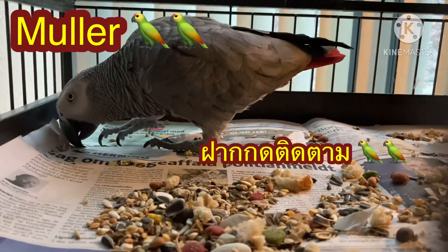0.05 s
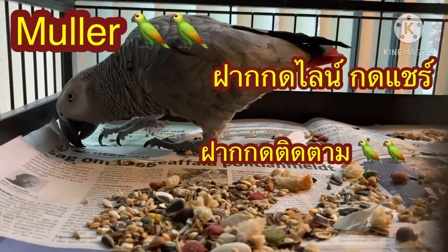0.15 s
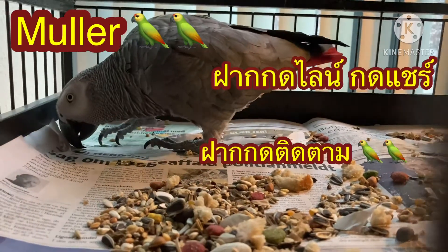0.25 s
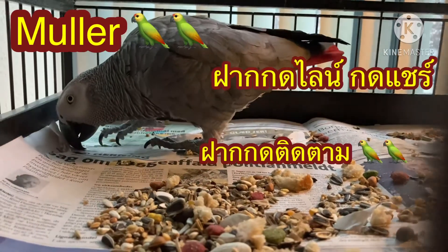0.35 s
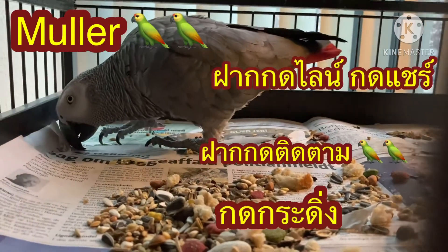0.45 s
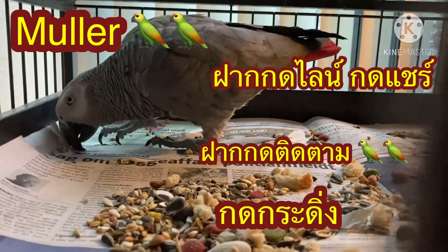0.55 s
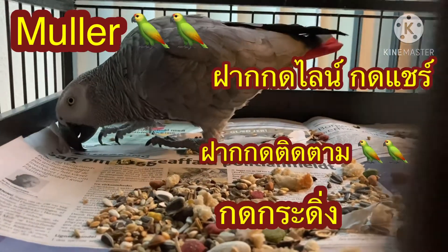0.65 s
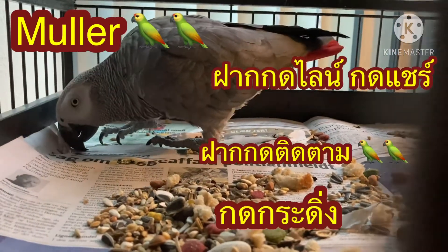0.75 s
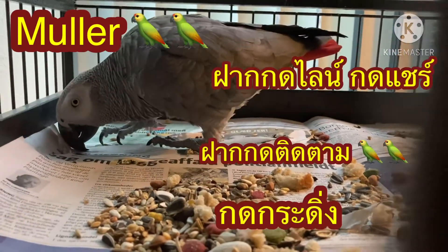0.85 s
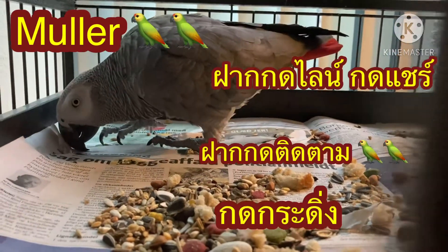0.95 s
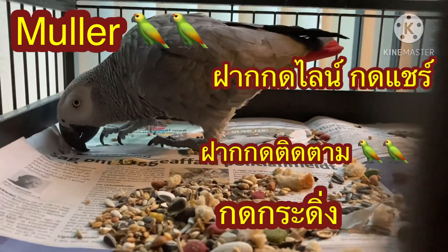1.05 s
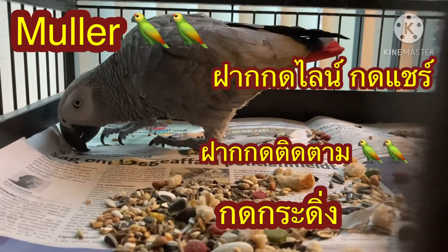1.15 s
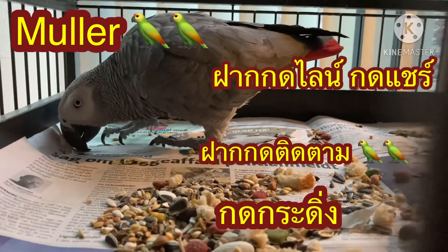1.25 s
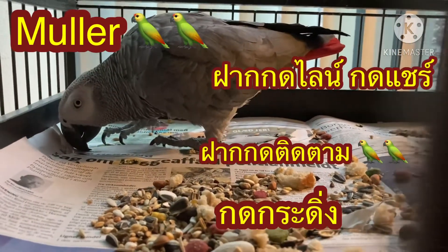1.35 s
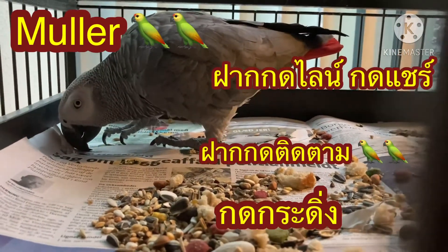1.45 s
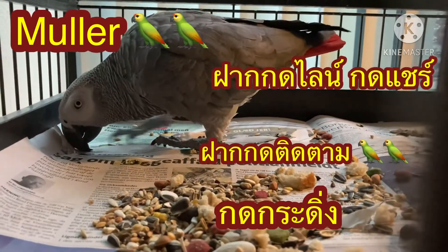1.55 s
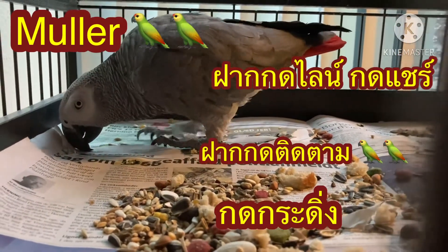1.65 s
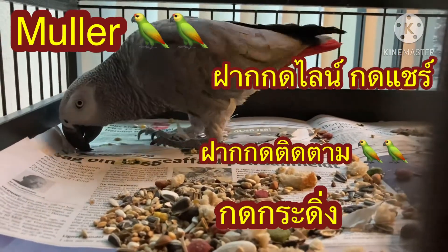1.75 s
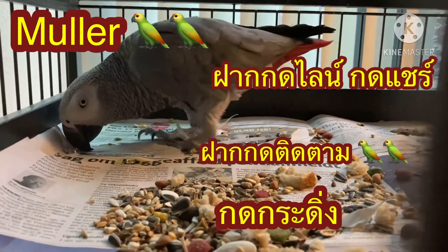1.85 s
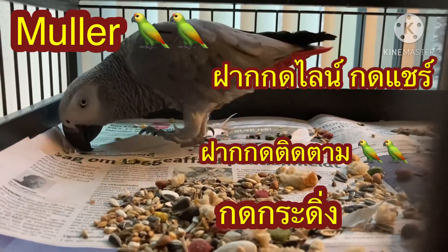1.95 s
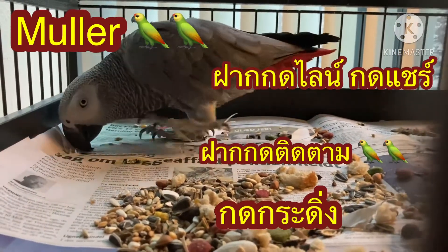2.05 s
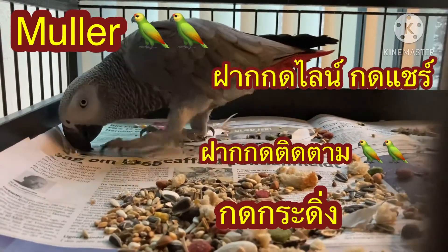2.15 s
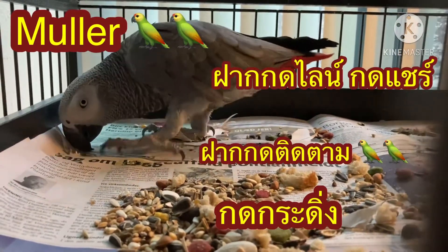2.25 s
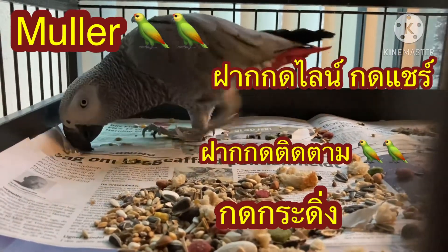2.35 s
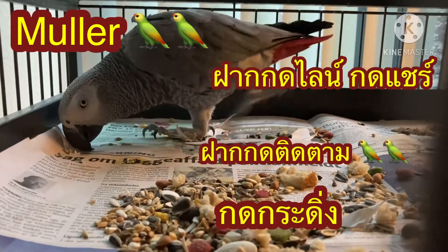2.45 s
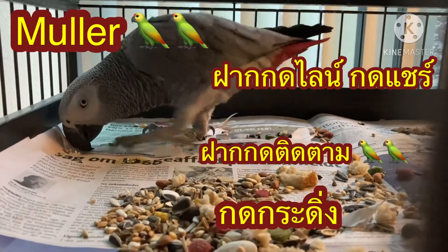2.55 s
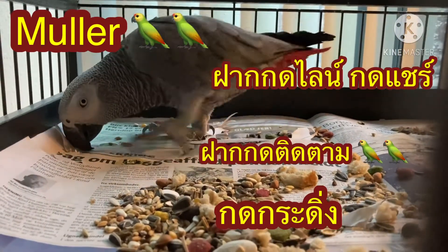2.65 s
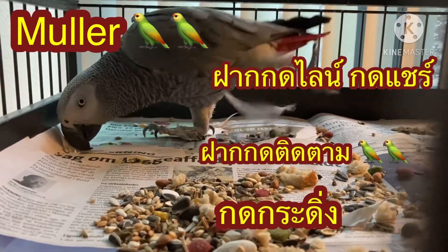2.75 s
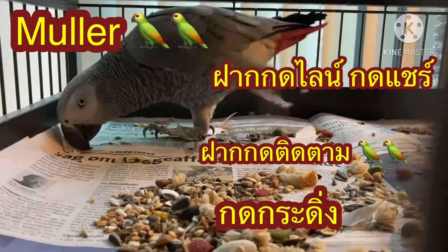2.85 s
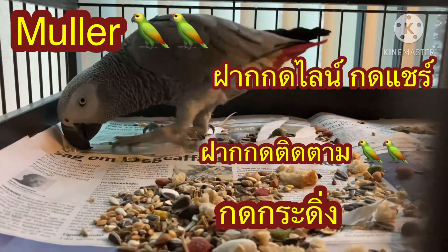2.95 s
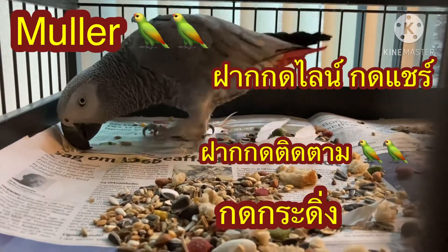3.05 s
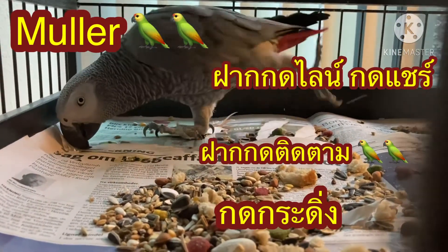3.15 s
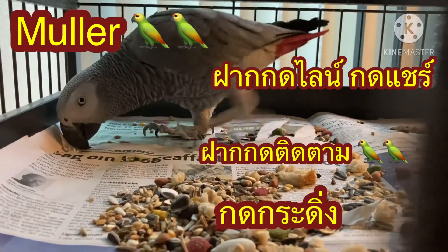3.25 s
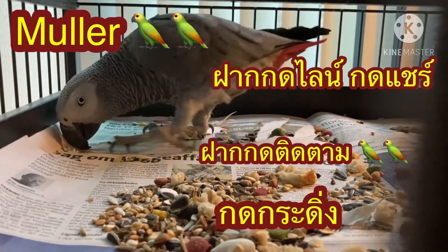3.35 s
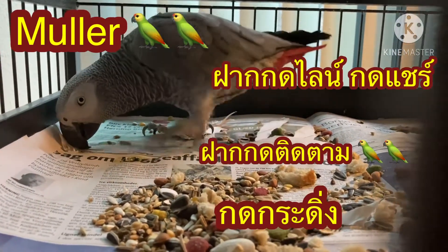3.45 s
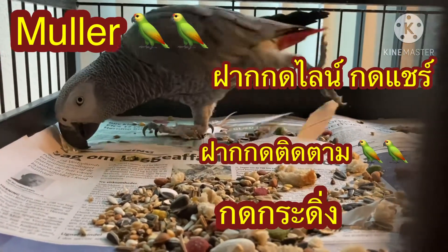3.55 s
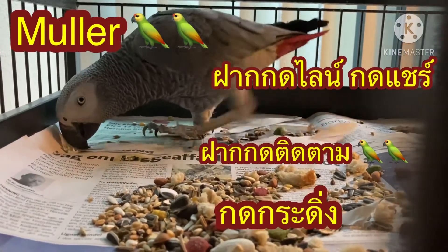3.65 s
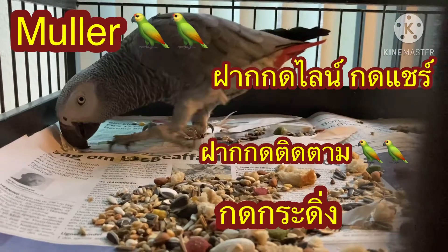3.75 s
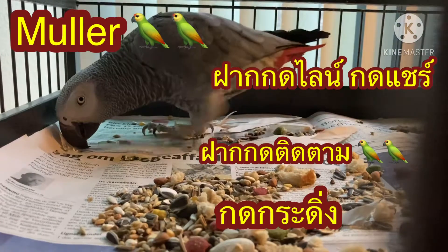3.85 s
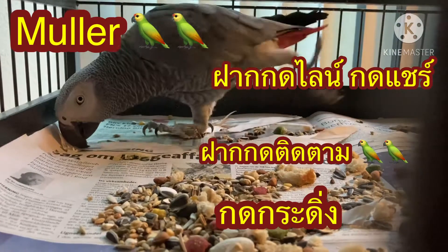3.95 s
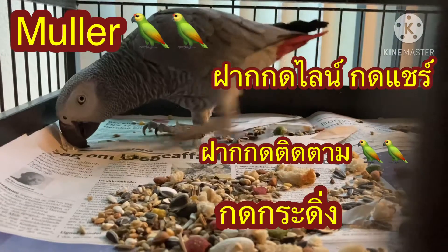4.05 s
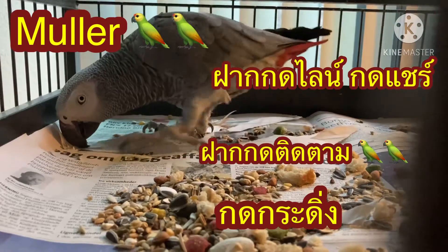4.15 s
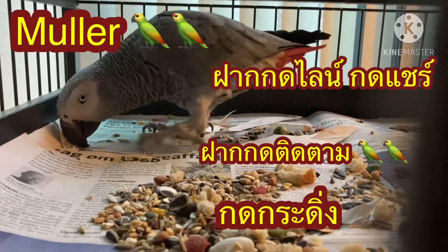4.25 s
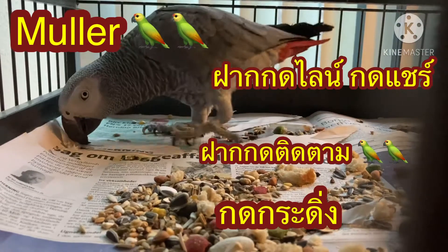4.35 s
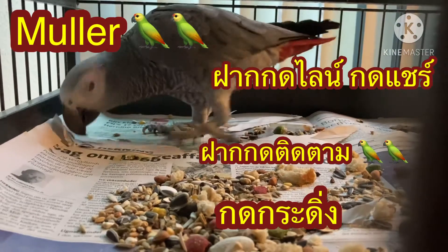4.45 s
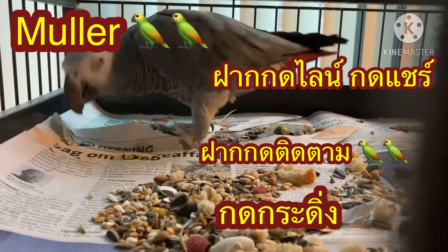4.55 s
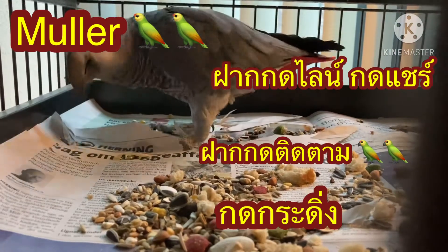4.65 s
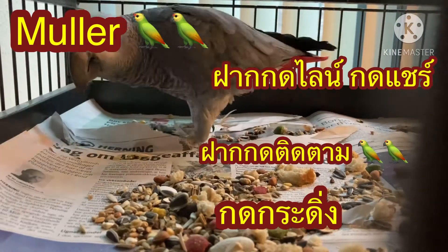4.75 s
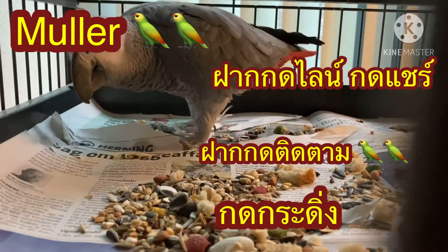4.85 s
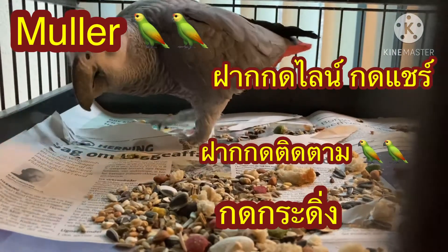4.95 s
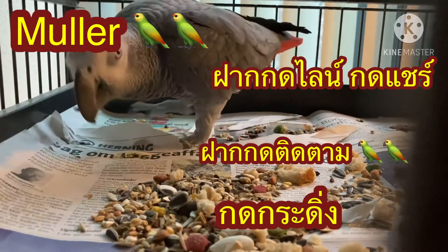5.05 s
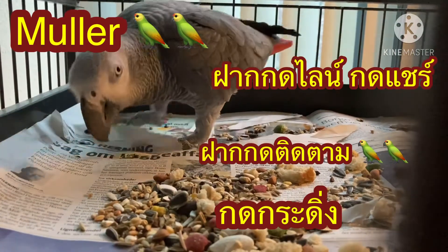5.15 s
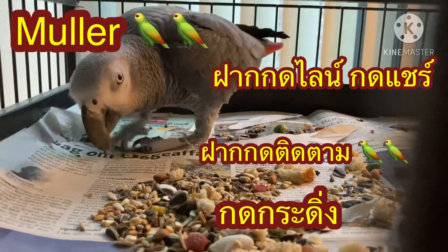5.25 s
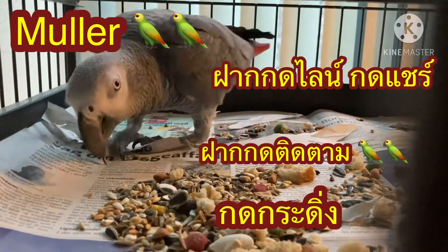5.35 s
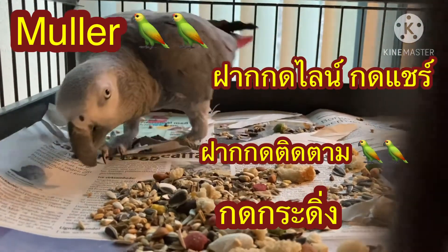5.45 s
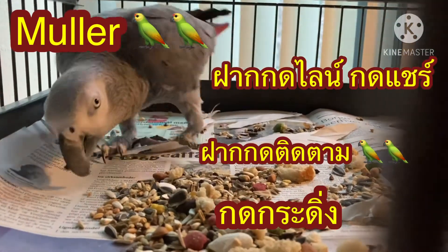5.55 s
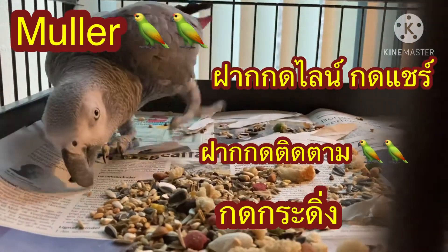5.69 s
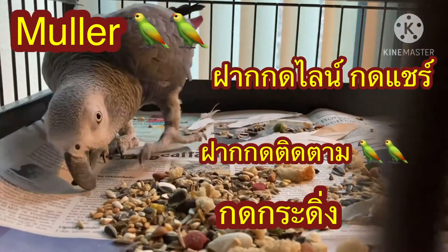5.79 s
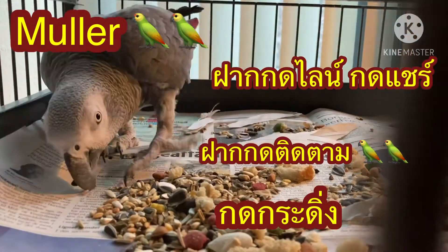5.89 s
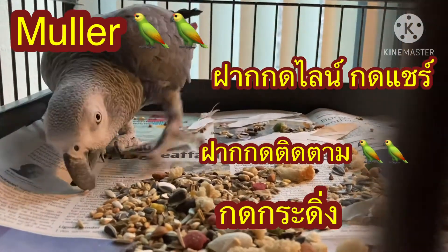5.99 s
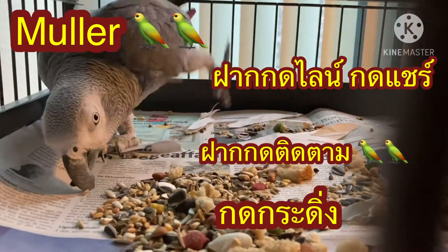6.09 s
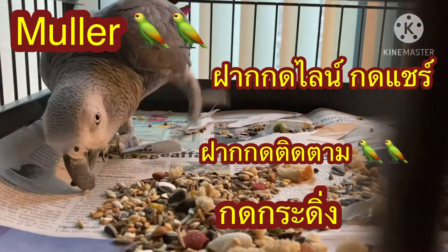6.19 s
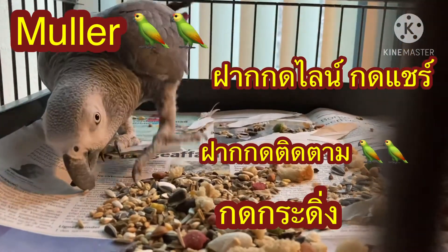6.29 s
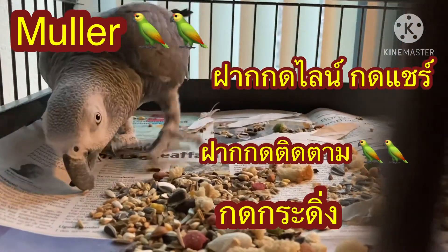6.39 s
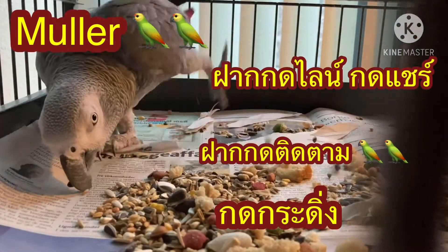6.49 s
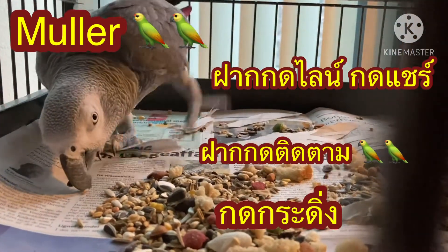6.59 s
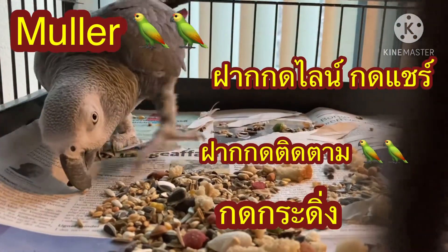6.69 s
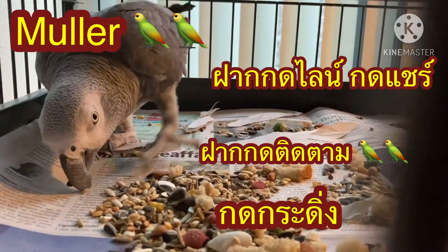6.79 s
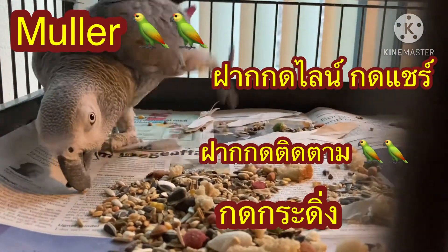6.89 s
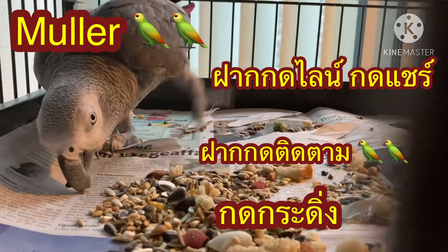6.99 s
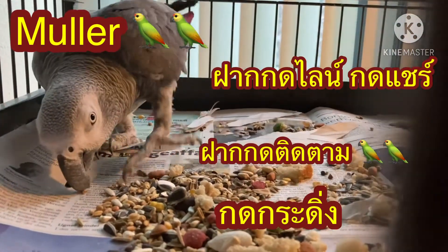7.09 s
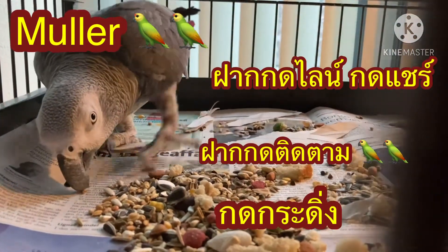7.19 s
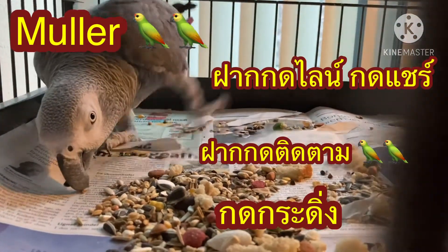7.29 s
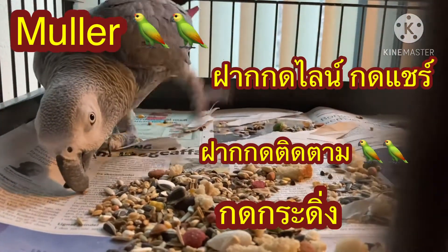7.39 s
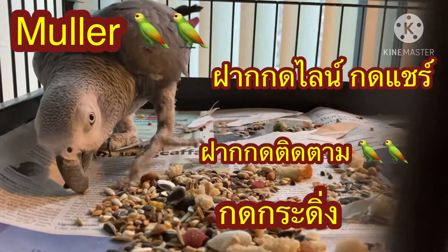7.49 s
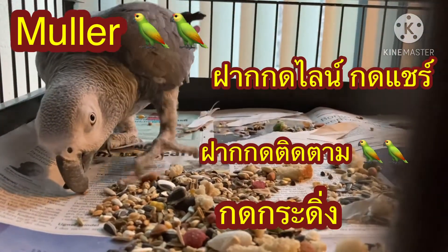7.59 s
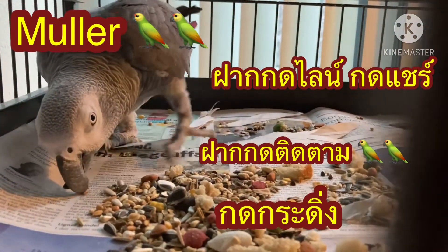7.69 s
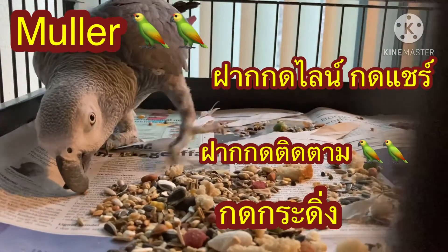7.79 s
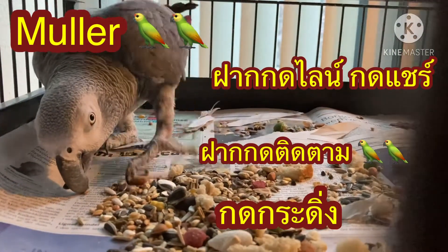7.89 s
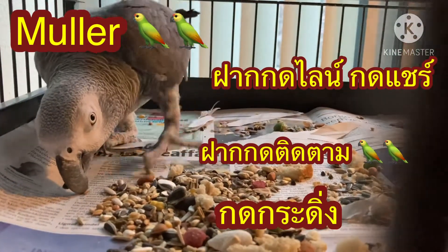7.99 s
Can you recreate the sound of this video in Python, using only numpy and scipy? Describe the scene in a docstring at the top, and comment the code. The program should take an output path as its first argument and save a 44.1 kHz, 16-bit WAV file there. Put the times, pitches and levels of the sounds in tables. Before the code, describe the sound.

A parrot scratches backward through seeds on crinkling newspaper in a cage, raking in short bouts, banging the tray once, tapping its beak between them.

```python
"""A parrot scratches backwards with its foot, again and again, on seed-strewn newspaper in a cage. Clumped
random grains make the dragged claws, creasing paper, flung seeds and shaken tray of each stroke. One kick bangs
the tray, a later one snaps the sheet; noise bursts and decaying tones make these, the footfalls, the clicking
seeds and the beak that taps the floor in a pause. Noise resonating at one low pitch makes each boom. A small,
quiet room; a close stereo microphone with two ports hears it all over a faint rumble and hiss."""
import sys
import numpy as np
from scipy import signal
from scipy.fft import rfft, irfft
from scipy.io import wavfile

SR = 44100
rng = np.random.default_rng(int(sys.argv[2]) if len(sys.argv) > 2 else 0)


def output_pcm(signal):
    """Save a mono or channel-first signal as 16-bit PCM at the path in sys.argv[1].

    Samples are clipped to [-1, 1] before scaling.
    """
    pcm = np.clip(np.atleast_2d(signal).T, -1, 1) * 32767
    wavfile.write(sys.argv[1], SR, np.round(pcm).astype(np.int16))


N = 354123
T = np.arange(N) / SR
SLOW_T = T[::64]  # coarse clock for the movements
FILTER_TAPS = 8192
FILTER_HZ = np.fft.rfftfreq(FILTER_TAPS, 1 / SR)


def amp(db):
    """Decibels to gain."""
    return 10 ** (np.asarray(db) / 20)


def evened(x):
    """Scales to rms 1."""
    return x / np.sqrt(np.mean(x ** 2) + 1e-20)


def read(points, hz):
    """Reads a curve on a log-frequency axis."""
    f, value = np.transpose(points)
    return np.interp(np.log(hz + 1), np.log(f + 1), value)


def add(mix, s, sound):
    """Mixes a sound in at time s."""
    part = mix[round(s * SR):][:len(sound)]
    part += sound[:len(part)]


# Resonances of the tray and cage. Each row: pitch in Hz, width in Hz, height in dB before its share.
CAGE_RESONANCES = [(251, 16, 12.5), (281.5, 23, 11), (409, 6.7, 6), (749, 37, 5.5), (1020, 11, 7.5),
                   (1125, 56, 4.5), (1188, 20, -2.5), (1510, 13, 7), (1760, 23, -4), (1726, 16, 6.5),
                   (2280, 8.8, -1.5), (2260, 25, -5.5), (2890, 4.7, 4), (3010, 16, 9), (3520, 77, 4),
                   (3754, 170, 6)]


def colour(x, tone, ring=0):
    """Causal filter of unit energy: a broad spectrum, plus a share of the cage's resonances in dB."""
    resonances = sum(g / (1 + (2 * (FILTER_HZ - f) / w) ** 2) for f, w, g in CAGE_RESONANCES)
    db = read(tone, FILTER_HZ) + ring * resonances
    log_gain = np.log(amp(np.r_[db, db[-2:0:-1]]))
    # the minimum phase that belongs to this gain
    response = np.fft.ifft(np.exp(np.conj(signal.hilbert(log_gain)))).real
    return signal.oaconvolve(x, response / np.linalg.norm(response))[:len(x)]


def resonate(x, hz, width_hz):
    """A resonance of gain 1 that follows the curve hz."""
    turn = np.exp(2j * np.pi * np.cumsum(hz) / SR)
    r = np.exp(-np.pi * width_hz / SR)
    return 2 * (turn * signal.lfilter([1 - r], [1, -r], x / turn)).real


def wander(rate_hz):
    """Smooth chance of rms 1 with changes up to about the given rate."""
    hz = np.fft.rfftfreq(N, 1 / SR)
    return evened(irfft(rfft(rng.standard_normal(N)) / (1 + (hz / rate_hz) ** 4), N))


def grains(per_s, spread_db, clump_db, clump_hz):
    """Tiny slips and impacts of uneven size that arrive in clumps."""
    size = amp(spread_db * np.minimum(rng.exponential(1, N), 4))
    clicks = size * rng.choice([-1, 1], N) * (rng.random(N) < per_s / SR)
    return evened(clicks * amp(clump_db * wander(clump_hz)))


def burst(t60, rise):
    """Up to a quarter second of noisy contact that rises quickly and dies away."""
    t = T[:SR // 4]
    return rng.standard_normal(len(t)) * amp(-60 * t / t60) * (1 - np.exp(-t / rise))


def swell(s, rise_s, fall_s, hold_s=0):
    """Grows exponentially, holds for hold_s up to time s, then dies away."""
    before = np.maximum(s - hold_s - SLOW_T, 0)
    after = np.maximum(SLOW_T - s, 0)
    return np.exp(-before / rise_s - after / fall_s)


def rustle(s, length, rise_s=0.0025, sag_db_per_s=19.5, fall_s=0.021):
    """Starts quickly, sags while the weight shifts, then settles."""
    age = np.maximum(SLOW_T - s, 0)
    settling = np.exp(-np.maximum(age - length, 0) / fall_s)
    return (1 - np.exp(-age / rise_s)) * amp(-sag_db_per_s * age) * settling


def together(moves, rest_db):
    """Movements add in power over a faint steady stir: a gain at every sample."""
    power = amp(rest_db) ** 2 + np.sum(np.square(moves), axis=0)
    return np.interp(T, SLOW_T, np.sqrt(power))


# Background of the small room. Each row: frequency in Hz, relative level in dB per Hz.
BACKGROUND_TONE = [(20, 0), (60, -2), (120, -8), (280, -14.5), (550, -29), (1400, -31.5), (4000, -33),
                   (10000, -59), (16000, -38)]


def room_noise():
    """A faint low rumble and hiss from filtered noise, mostly shared by the ports."""
    left, right, shared = (colour(rng.standard_normal(N), BACKGROUND_TONE) for _ in range(3))
    return amp(-71) * evened(shared + 0.36 * np.array([left, right]))


# The clearest single seeds and creases clicking close to the microphone.
# Each row: start in seconds, relative level in dB, dull body against treble in dB.
CLEAR_TICKS = [(0.111, -62, -5.5), (0.602, -39, -11), (0.724, -53.5, -16.5), (0.8126, -51, -15),
               (1.2125, -49, -21), (1.9176, -41, -16), (2.0906, -38, -7.5), (2.2378, -33, -2.5),
               (2.4885, -41, -16), (2.6553, -22.5, -2.5), (2.7603, -27.5, -4.5), (3.015, -37, 9.5),
               (3.0394, -28.5, -6), (3.1149, -32, -12.5), (3.4413, -25.5, 0.5), (3.6489, -37, -4),
               (4.083, -36.5, -1.5), (5.2194, -26, -15.5), (5.2299, -33.5, -13.5), (5.3534, -30, -24),
               (5.7032, -33, -31), (5.952, -24, -3), (5.9659, -18, -12.5), (6.1945, -38.5, -30.5),
               (6.352, -17.5, -28), (6.371, -25, 1.5), (6.454, -31, -21.5), (6.7536, -18, -9),
               (6.78, -16, -6.5), (6.837, -30, -25), (6.8572, -31, -15), (7.1549, -17, -9),
               (7.1656, -25.5, -7.5), (7.1806, -20.5, -15.5), (7.1881, -21.5, -15), (7.5094, -37.5, -3),
               (7.766, -32.5, -13)]


def ticks():
    """A hard seed clicks with its own brief pitch, over a duller knock on the paper."""
    out, t = np.zeros(N), T[:SR // 4]
    for s, db, body_db in CLEAR_TICKS + strays():
        contact = burst(t60=.009, rise=.0005)
        shell = np.sin(2 * np.pi * rng.uniform(6500, 11000) * t) * amp(-60 * t / 0.012)
        click = colour(contact + 0.27 * shell, SEED_TONE)
        body = colour(burst(t60=0.0099, rise=0.00023), PAPER_TONE, ring=0.44)
        tick = click / abs(click).max() + amp(body_db) * body / abs(body).max()
        add(out, s, amp(db + 3.5) * tick)
    return out


def strays(count=70, crowding=.5, above_db=11.5, spread_db=5, body_db=-7):
    """Rows like CLEAR_TICKS for seeds that land at random, more and louder while the heap is stirred."""
    stir = skittering()
    chance = np.cumsum(stir ** crowding)
    when, size = rng.random((count, 2)).T
    at = np.searchsorted(chance, when * chance[-1])
    level_db = 20 * np.log10(stir[at]) + above_db + spread_db * (2 * size - 1)
    return [(s, db, body_db) for s, db in zip(T[at], level_db)]


# Backward strokes of the foot; the four layers below share them. Each row: release in seconds,
# wind-up in seconds before each layer's factor, relative levels of claws, paper, seeds and tray in dB,
# seconds by which the seeds fly early (negative: late).
FOOT_STROKES = [(2.283, .01, -31.5, -41.5, -46.5, -59, -0.0012),
                (2.655, 0.018, -33.5, -35, -41, -42, -0.0035),
                (3.034, 0.033, -41, -29.5, -41, -43.5, -0.0011),
                (3.436, 0.044, -41.5, -31.5, -42.5, -48, -0.0075),
                (3.825, .028, -36.5, -24, -46, -41.5, -0.0017),
                (5.989, 0.051, -40.5, -27.5, -41, -39, 0.034), (6.375, 0.055, -34, -30, -39, -42.5, 0.013),
                (6.786, 0.056, -36.5, -24.5, -39.5, -38.5, 0.012),
                (7.195, 0.067, -37, -34.5, -39, -42.5, 0.01)]
# The bird shifts its weight and the sheet rustles; the four layers share this too. Each row: start in
# seconds, length in seconds, relative levels of claws, paper, seeds and tray in dB.
WEIGHT_SHIFTS = [(0.17, 0.18, -73.5, -65, -70, -74.5), (0.437, .11, -83.5, -70.5, -75.5, -88),
                 (0.57, .11, -81, -66.5, -65.5, -83.5), (1.477, 0.15, -70.5, -90, -65.5, -74),
                 (1.651, 0.16, -60.5, -60.5, -66, -65), (1.774, 0.094, -65, -62, -54, -69.5),
                 (1.913, 0.036, -62, -51, -48.5, -57.5), (2.098, 0.16, -58, -53.5, -57.5, -60.5),
                 (2.363, .11, -54, -50.5, -69, -67), (2.498, 0.14, -60.5, -54.5, -57, -64),
                 (2.756, 0.027, -69, -41, -46.5, -49.5), (2.86, 0.027, -61, -48.5, -50.5, -58.5),
                 (2.939, 0.022, -54, -48, -55, -54), (3.241, 0.042, -58.5, -55, -53.5, -58),
                 (3.642, 0.0098, -59, -62, -51, -58), (4.002, 0.046, -52.5, -47, -45, -48),
                 (4.086, 0.33, -50.5, -53, -58, -57), (4.41, 0.043, -48, -58, -47.5, -50),
                 (4.503, .09, -63.5, -71, -63.5, -64), (4.779, 0.13, -81.5, -84, -78, -64.5),
                 (5.053, 0.29, -59, -60.5, -54.5, -64), (5.203, .02, -69, -49.5, -50.5, -50),
                 (5.519, 0.034, -74.5, -67, -52, -83.5), (5.7, 0.031, -56, -66, -54.5, -61.5),
                 (5.859, 0.032, -51, -56, -61, -69), (7.372, .33, -54.5, -55.5, -54, -53),
                 (7.725, 0.16, -55.5, -58.5, -58.5, -55.5), (7.938, 0.075, -48, -55.5, -55.5, -57)]
# Slow pulls of the claws over the sheet.
# Each row: the hardest moment in seconds, length in seconds, relative level in dB.
CLAW_PULLS = [(1.83, 0.1, -48.5), (2.582, 0.079, -41), (2.969, 0.065, -42.5), (3.365, 0.057, -41),
              (3.764, 0.079, -38.5), (4.211, 0.041, -38.5), (4.265, 0.054, -36), (4.435, 0.075, -37.5),
              (4.784, 0.34, -66), (5.926, 0.082, -37.5), (7.12, 0.048, -38.5), (7.603, 0.11, -35),
              (7.909, 0.091, -37.5), (7.976, 0.12, -35.5)]


def dragging(grip=0.83, let_go_s=0.0099):
    """The claws bite during the wind-up, grip for a share of it and let go at the release."""
    strokes = [amp(db) * swell(s, 0.56 * windup, let_go_s, grip * windup)
               for s, windup, db, *_ in FOOT_STROKES]
    pulls = [amp(db) * np.exp(-(2 * (SLOW_T - s) / length) ** 2 * 2) for s, length, db in CLAW_PULLS]
    shifts = [amp(db) * rustle(s, length) for s, length, db, *_ in WEIGHT_SHIFTS]
    return together(strokes + pulls + shifts, rest_db=-88)


# Claws on newspaper. Each row: frequency in Hz, relative level in dB per Hz.
CLAW_TONE = [(60, -33.5), (300, -14.5), (550, -8), (800, -7.5), (1100, 1), (1500, -3), (2100, -13),
             (2800, -23), (6000, -24.5), (16000, -25.5)]


def claws():
    """Claws stick and slip on the paper; the patch of sheet they pull on rings at a shifting pitch."""
    slips = grains(per_s=1200, spread_db=2.5, clump_db=3.03, clump_hz=80)
    patch = resonate(slips, 1180 * np.exp(0.41 * wander(rate_hz=3.9)), width_hz=260)
    return colour((slips + 0.14 * patch) * dragging(), CLAW_TONE, ring=0.56)


def flexing(spring_s=0.011, settle_db=-15, settle_s=0.077):
    """The sheet springs back at the release, then slowly settles."""
    springs = [amp(db) * swell(s, 0.35 * windup, spring_s) for s, windup, _, db, *_ in FOOT_STROKES]
    settling = [amp(db + settle_db) * swell(s, 1.1 * windup, settle_s)
                for s, windup, _, db, *_ in FOOT_STROKES]
    shifts = [amp(db) * rustle(s, length) for s, length, _, db, *_ in WEIGHT_SHIFTS]
    return together(springs + settling + shifts, rest_db=-87)


# Creasing newspaper. Each row: frequency in Hz, relative level in dB per Hz.
PAPER_TONE = [(100, -23.5), (800, -11.5), (1600, -2), (2200, -2.5), (2900, -5.5), (4000, -6), (4800, -8.5),
              (5600, -12.5), (9000, -46.5), (16000, -34.5)]


def paper():
    """The sheet buckles in many small creases and a few sharp ones; its stiff fold rings as it bends."""
    fine = grains(per_s=5100, spread_db=0.0, clump_db=8.0, clump_hz=120)
    sharp = grains(per_s=220, spread_db=6.5, clump_db=0, clump_hz=40)
    creases = evened(fine + .5 * sharp) * flexing()
    fold = resonate(creases, 2220 * np.exp(.05 * wander(rate_hz=10)), width_hz=200)
    return amp(-0.5) * colour(0.82 * creases + 0.65 * fold, PAPER_TONE, ring=0.31)


def skittering(spray_s=0.018, roll_db=-11, roll_s=.11):
    """Each stroke throws a spray of seeds, some of which roll on."""
    sprays = [amp(db) * swell(s - early, .5 * windup, spray_s)
              for s, windup, _, _, db, _, early in FOOT_STROKES]
    rolling = [amp(db + roll_db) * swell(s - early, 1.1 * windup, roll_s)
               for s, windup, _, _, db, _, early in FOOT_STROKES]
    shifts = [amp(db) * rustle(s, length) for s, length, _, _, db, _ in WEIGHT_SHIFTS]
    return together(sprays + rolling + shifts, rest_db=-84.5)


# Seeds and husks on the sheet. Each row: frequency in Hz, relative level in dB per Hz.
SEED_TONE = [(200, -5), (2000, -15), (4500, -5.5), (5600, -2), (7000, 3), (7600, 2), (9800, 1),
             (12000, -0.5), (14000, -2.5), (15700, -4)]


def seeds():
    """Husks slide over the sheet with a fine hiss, while a few seeds hop."""
    sliding = grains(per_s=8700, spread_db=0.5, clump_db=-0.7, clump_hz=150)
    hops = grains(per_s=550, spread_db=5.5, clump_db=9, clump_hz=60)
    return colour(evened(sliding + 0.72 * hops) * skittering(), SEED_TONE)


def shaking(lead_s=0.013, calm_s=0.043):
    """The push on the tray is greatest just before the release."""
    strokes = [amp(db) * swell(s - lead_s, 0.97 * windup, calm_s)
               for s, windup, _, _, _, db, _ in FOOT_STROKES]
    shifts = [amp(db) * rustle(s, length) for s, length, *_, db in WEIGHT_SHIFTS]
    return together(strokes + shifts, rest_db=-83)


# The tray beneath the sheet. Each row: frequency in Hz, relative level in dB per Hz.
TRAY_TONE = [(25, -36), (60, -2.5), (110, -8), (160, -8.5), (260, -3.5), (340, -6.5), (450, -3),
             (700, -5.5), (1500, -32.5), (6000, -65)]


def tray():
    """The floor of the cage rumbles under each push."""
    pushes = grains(per_s=900, spread_db=0.5, clump_db=5.0, clump_hz=39.8)
    return amp(-1.0) * colour(pushes * shaking(), TRAY_TONE, ring=0.71)


# Short scuffs of a toe or the beak on the sheet.
# Each row: start in seconds, relative level in dB, time to fall 60 dB in seconds.
SHEET_SCUFFS = [(.180, -57, 0.085), (.450, -72, 0.14), (.600, -67.5, 0.28), (0.813, -63, 0.1),
                (1.212, -57, 0.072), (1.488, -59.5, 0.14), (1.587, -55.5, 0.24), (1.918, -45, 0.04),
                (2.165, -40, 0.16), (3.013, -57, 0.058), (4.253, -43.5, 0.029), (4.425, -31, 0.041),
                (5.351, -42.5, 0.027), (5.703, -56, .07), (5.722, -52.5, 0.03), (7.096, -45, 0.3)]


def scuffs():
    """A scuff starts at once and crumbles away as filtered noise."""
    out = np.zeros(N)
    for s, db, t60 in SHEET_SCUFFS:
        add(out, s, amp(db) * burst(t60, rise=.001))
    tone = [(100, -14), (300, -7), (700, -3.0), (1100, 4.5),
            (2200, -3.5), (3500, -10.5), (6000, -16.5), (16000, -31)]  # Hz, dB per Hz
    return colour(out, tone, ring=0.91)


# The cage sways with a deep, soft boom.
# Each row: middle in seconds, relative level in dB, pitch in Hz, length in seconds.
CAGE_BOOMS = [(0.616, -64, 73.4, 0.41), (1.546, -68, 103.4, 0.21), (3.89, -59.5, 55, 0.35),
              (6.436, -52, 88.8, .25), (7.178, -57.5, 109, 0.4)]


def booms():
    """Each sway is noise resonating around one low pitch that swells and fades."""
    out = np.zeros(N)
    low_pass = signal.butter(2, 140, fs=SR, output="sos")
    for s, db, hz, length in CAGE_BOOMS:
        shape = np.hanning(int(length * SR))
        sway = resonate(rng.standard_normal(SR), np.full(SR, hz), width_hz=19)[-len(shape):]
        add(out, s - length / 2, amp(db) * shape * evened(signal.sosfilt(low_pass, sway)))
    return out


# The tray rings when struck hard.
# Each row: pitch in Hz, relative level in dB, time to fall 60 dB in seconds.
TRAY_RINGING = [(301, -20.5, 0.43), (758, -5, 0.2), (1077, 7, 0.12), (1044, -11, 0.27), (1710, -5, 0.11),
                (1785, -12.5, 0.31), (2220, -12.5, .25), (2496, -7, .2)]
# The bang against the tray. Each row: frequency in Hz, relative level in dB per Hz.
KICK_TONE = [(60, -40.5), (130, -33.5), (260, -14.5), (400, -10), (700, -4), (1050, 4.5), (1500, 3.5),
             (2100, 1), (2800, -1.5), (4200, -7.5), (5500, -15), (7500, -31.5), (16000, -41)]
# The snap of the sheet. Each row: frequency in Hz, relative level in dB per Hz.
SHEET_SNAP_TONE = [(60, -14), (280, -17.5), (750, -41), (1050, 2), (2800, -5), (4200, 5.5), (5500, -1.5),
                   (7000, -1.5), (10000, 1.5), (15500, -9)]


def kicks():
    """One kick cracks against the tray, which rattles and rings; a later one snaps the sheet."""
    out, t = np.zeros(N), T[:SR // 2]
    rattle = burst(t60=0.08, rise=0.00077) + burst(t60=0.018, rise=0.00067)
    ringing = sum(amp(db - 60 * t / t60) * np.sin(2 * np.pi * (hz * t + rng.random()))
                  for hz, db, t60 in TRAY_RINGING)
    snap = burst(t60=0.078, rise=0.0003)
    add(out, 2.2812, amp(-13.0) * colour(rattle, KICK_TONE, ring=0.77))
    add(out, 2.2815, amp(-26.0) * ringing * (1 - np.exp(-t / 0.00069)))
    add(out, 7.2532, amp(-19.0) * colour(snap, SHEET_SNAP_TONE, ring=0.32))
    return out


def recoil(hz=255, over_db=1, rise_s=0.0099, fall_s=0.03):
    """Around each release the tray swings briefly at a low, slightly wavering pitch."""
    swings = [amp(db + over_db) * swell(s, rise_s, fall_s) for s, _, _, _, _, db, _ in FOOT_STROKES]
    pitch = hz * (1 + .08 * wander(rate_hz=14.22))
    return together(swings, rest_db=-100) * np.sin(2 * np.pi * np.cumsum(pitch) / SR)


# The foot lands on the padded tray. Each row: start in seconds, relative level in dB, tray pitch in Hz.
FOOTFALLS = [(2.548, -54, 255.4), (2.942, -43.5, 275.8), (3.383, -37.5, 284), (5.102, -54, 174.4),
             (5.194, -41.5, 120.6), (5.862, -48.5, 258.3), (6.23, -36.5, 265), (6.641, -47.5, 254),
             (7.028, -37.5, 246.6)]
# Contact of the foot. Each row: frequency in Hz, relative level in dB per Hz.
FOOT_TONE = [(40, -56), (120, -48), (260, -18), (550, -1), (1000, -4.5), (1500, -6), (2200, -37),
             (4000, -43), (16000, -66)]


def steps():
    """A soft foot thumps the tray: a damped low tone under a burst of contact noise."""
    out, t = np.zeros(N), T[:SR // 4]
    for s, db, hz in FOOTFALLS:
        thump = np.sin(2 * np.pi * hz * t) * amp(-60 * t / 0.039) * (1 - np.exp(-t / 0.0023))
        contact = colour(burst(t60=0.053, rise=0.00051), FOOT_TONE, ring=0.89)
        add(out, s, amp(db) * (2.23 * thump + 1.24 * contact))
    return out


# Beak taps on the floor. Each row: start in seconds, relative level in dB, pitch in Hz.
BEAK_TAPS = [(3.704, -41, 664), (4.0855, -32.5, 880), (4.1326, -33.5, 740), (4.87, -50.5, 600),
             (5.064, -31.5, 1730), (5.1005, -23.5, 654), (5.1898, -19.5, 885), (5.703, -37, 1624)]
# The crack of the beak. Each row: frequency in Hz, relative level in dB per Hz.
BEAK_TONE = [(100, -12), (600, -2), (1800, 3), (2600, -4.5), (3800, -3), (6000, -8.5), (16000, -14)]


def beak():
    """The beak taps through the paper: a heavily damped knock with a dry crack."""
    out, t = np.zeros(N), T[:SR // 4]
    for s, db, hz in BEAK_TAPS:
        knock = np.sin(2 * np.pi * hz * t) * amp(-60 * t / .024) * (1 - np.exp(-t / .001))
        crack = colour(burst(t60=.02, rise=.001), BEAK_TONE)
        add(out, s, amp(db) * (1.26 * knock + 0.85 * crack))
    return out


# Direct sound at the microphone's ports. Each row: frequency in Hz, radians by which the left leads.
LEFT_LEAD = [(0, 0), (690, 0.7), (1810, 4.1), (2580, 9.0), (4570, 11.6), (6460, 6.5), (7320, 5.8),
             (9560, 2.5), (10600, 0.5), (12000, -0.3), (13100, -3.1), (14300, -3.3), (15200, -6.4),
             (16500, -6.2)]
# Direct sound at the ports. Each row: frequency in Hz, left minus right in dB.
LEFT_OVER_RIGHT = [(250, -0.5), (600, 5), (1200, 9), (2500, 7.5), (4500, 10), (7000, -0.5), (15000, .5)]


def at_ports(x, lag_ms=0):
    """Direct sound reaches the ports with different delay and strength; a source to one side adds lag."""
    phase = np.interp(FILTER_HZ, *np.transpose(LEFT_LEAD)) + 2 * np.pi * FILTER_HZ * lag_ms / 10 ** 3
    half = amp(read(LEFT_OVER_RIGHT, FILTER_HZ) / 2) * np.exp(.5j * phase)
    pair = np.array([half, 1 / half])
    pair /= np.sqrt(np.mean(abs(pair) ** 2, axis=0))
    response = np.fft.fftshift(irfft(pair), axes=1)
    return signal.oaconvolve(x[None], response, axes=1)[:, FILTER_TAPS // 2:][:, :N]


# Reverberation of the small room. Each row: frequency in Hz, time to fall 60 dB in seconds.
REVERB_T60 = [(150, 0.57), (400, 0.23), (1000, 0.25), (2800, 0.22), (7000, 0.17), (16000, 0.34)]
# Strength of the reverberation. Each row: frequency in Hz, relative level in dB.
REVERB_LEVEL = [(150, 4), (500, 1), (1200, 1), (3000, 3.5), (7000, -8.5), (15000, -22.5)]
# Likeness of the reverberation at the two ports. Each row: frequency in Hz, likeness from 0 to 1.
REVERB_LIKENESS = [(100, 0.1), (350, 1), (700, 0), (1300, 0.03), (16000, 0)]


def room(x, first_s=0.0017):
    """Dense reflections from the cage and walls; bass lasts longest, the ports agree most near 350 Hz."""
    taps = rng.standard_normal((2, SR)) * (rng.random((2, SR)) < .15) * (T[:SR] > first_s)
    hz, t, z = signal.stft(taps / np.linalg.norm(taps[0]), SR, nperseg=256)
    same = np.clip(read(REVERB_LIKENESS, hz), 0, 1)[:, None]
    t60 = read(REVERB_T60, hz)[:, None]
    z[1] = same * z[0] + np.sqrt(1 - same ** 2) * z[1]
    decay = amp(read(REVERB_LEVEL, hz)[:, None] - 60 * t / t60)
    z *= decay * np.sqrt(2 * np.log(1000) / t60)  # a longer decay carries no more energy
    response = signal.istft(z, SR, nperseg=256)[1]
    return signal.oaconvolve(x[None], response, axes=1)[:, :N]


def moving_room(x, count=4):
    """The point of contact keeps moving, so the pattern of reflections keeps changing."""
    turn = 2 * np.pi * 3.1 * T  # 3.1 turns per second
    patterns = (room(x * np.cos(turn + np.pi * k / count)) for k in range(count))
    return sum(patterns) * np.sqrt(2 / count)


def scene():
    """Mixes direct sound and reflections: clicks excite the room most, thumps less, taps least."""
    scratch = claws() + paper() + seeds() + tray() + scuffs()
    flung = seeds()  # a second spray, slightly to one side
    clicks, taps, blows, thumps = ticks(), beak(), kicks(), steps()
    near = at_ports(scratch + clicks + taps + blows + thumps + booms() + recoil())
    aside = at_ports(flung, lag_ms=.003)
    to_room = amp(-2.0) * (scratch + flung + blows) + amp(4.5) * clicks
    to_room += amp(-11.0) * taps + amp(-5) * thumps
    reflected = moving_room(to_room) * amp([[.2], [-.2]])  # dB left, right
    return near + aside + reflected + room_noise()


def record(dry, edge_hz=15900):
    """The recorder's band limit: a low-pass filter."""
    low_pass = signal.firwin(255, edge_hz, window=("kaiser", 9), fs=SR)
    return signal.oaconvolve(dry, low_pass[None], "same")


dry = scene()
out = record(dry)
output_pcm(out)
```